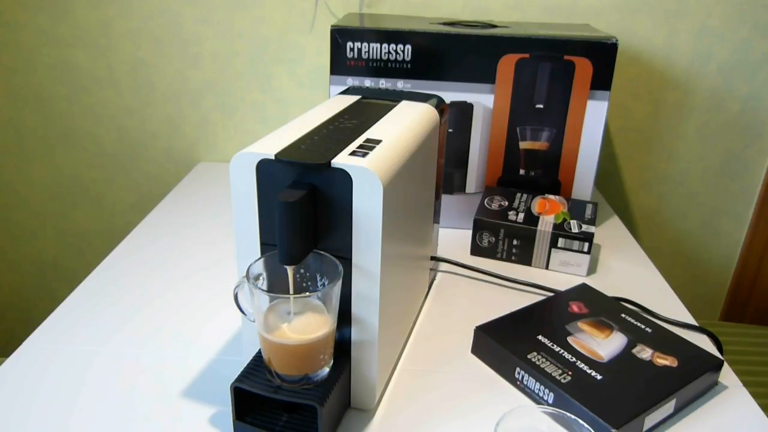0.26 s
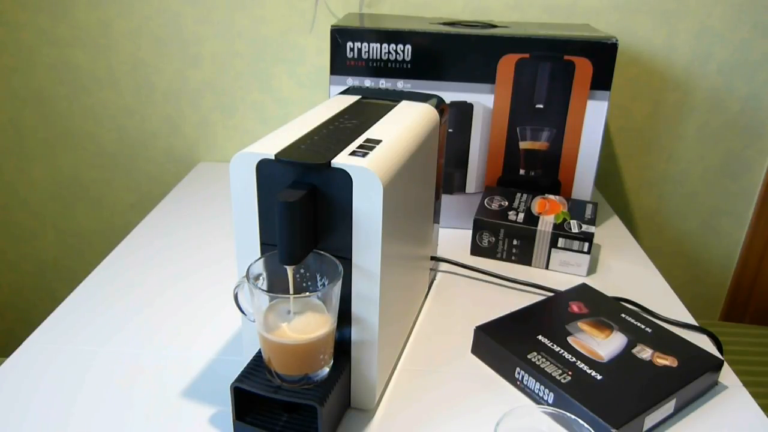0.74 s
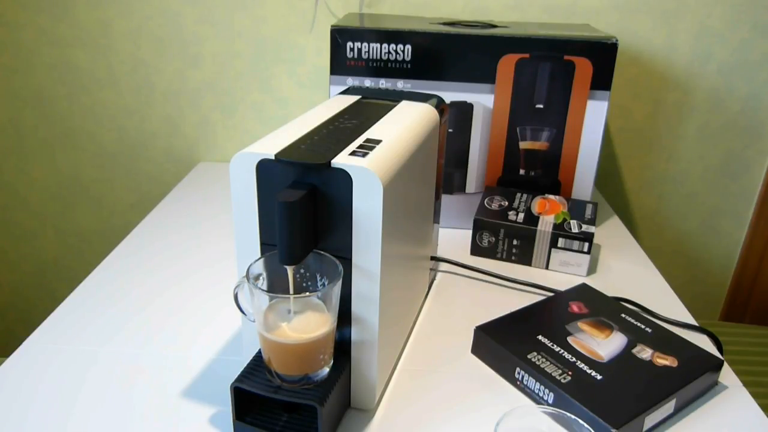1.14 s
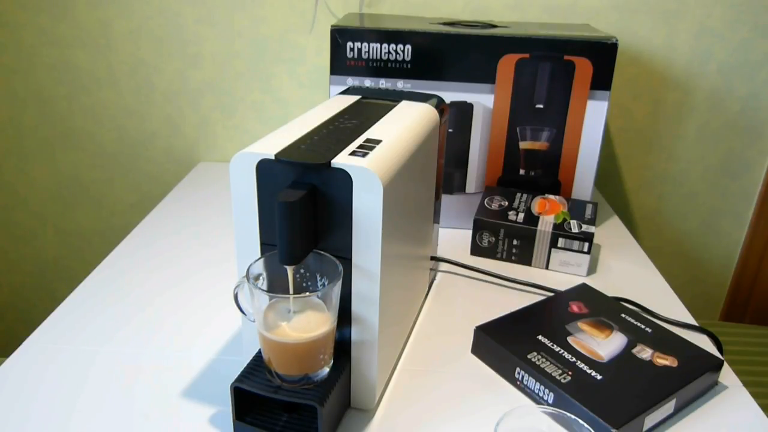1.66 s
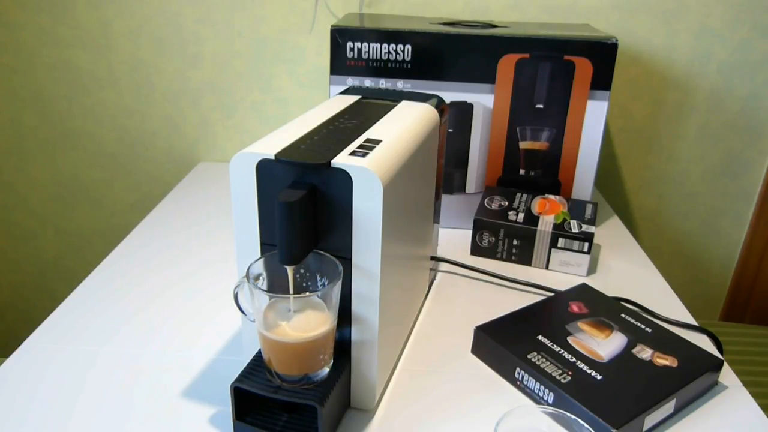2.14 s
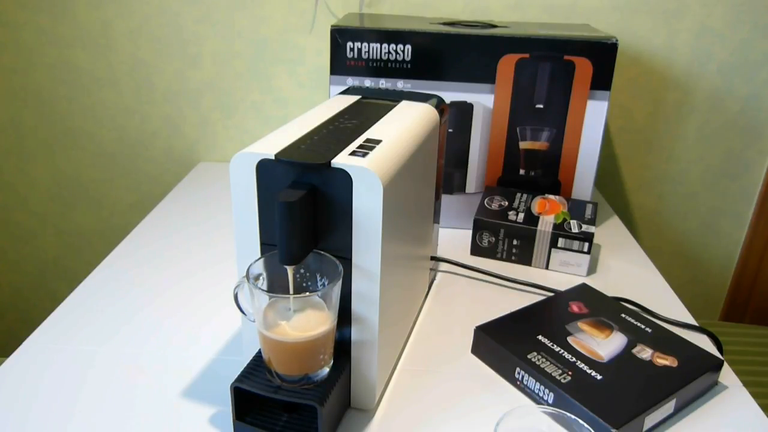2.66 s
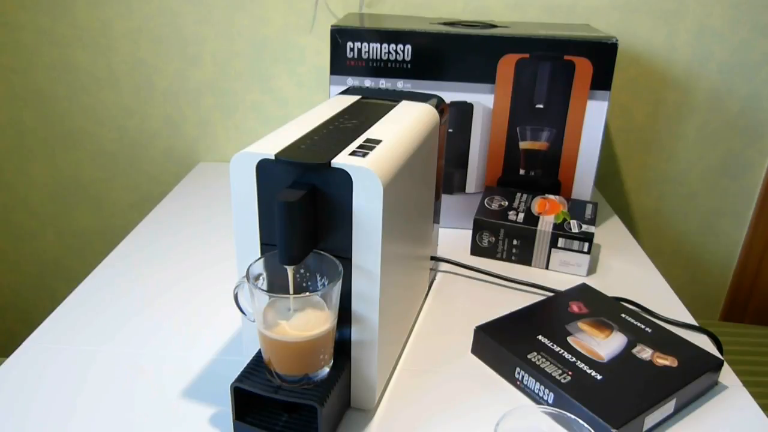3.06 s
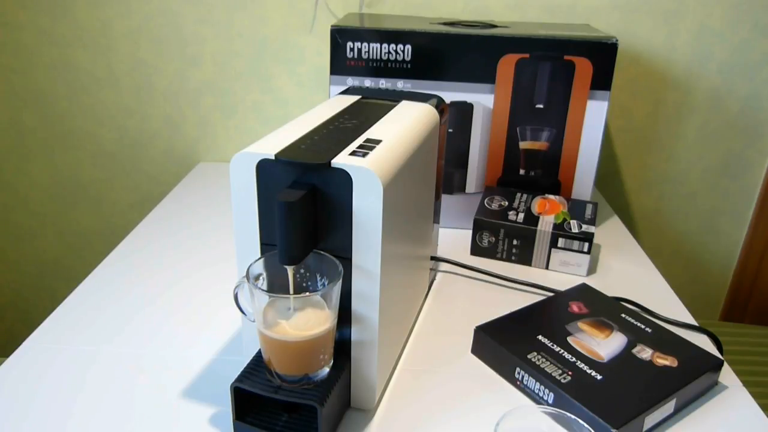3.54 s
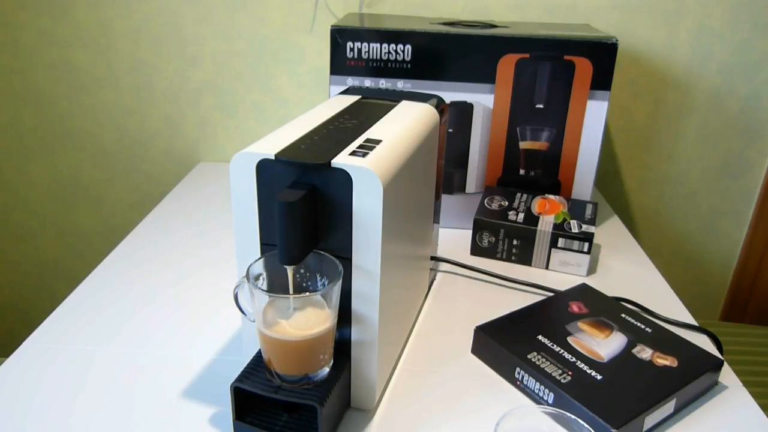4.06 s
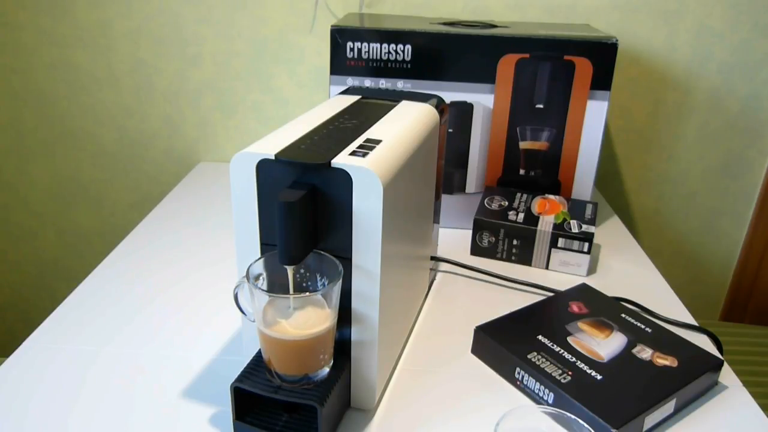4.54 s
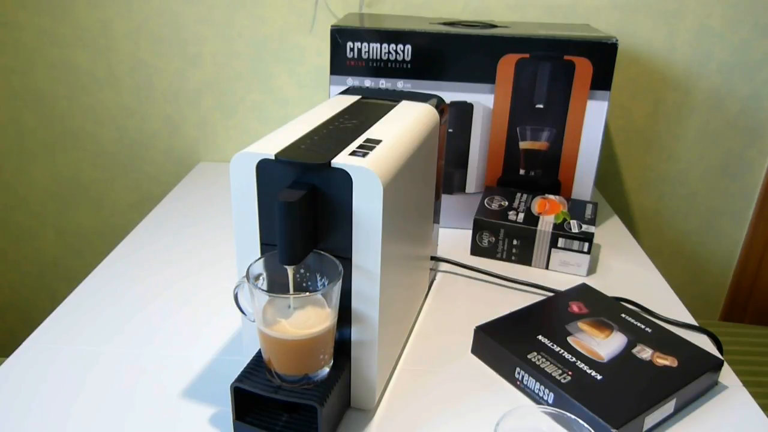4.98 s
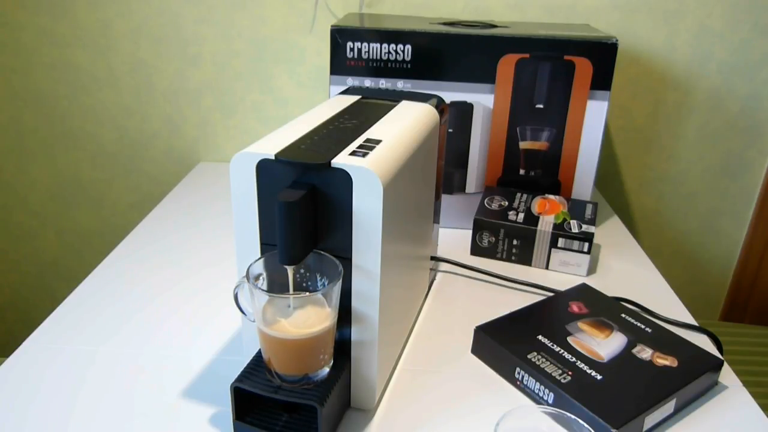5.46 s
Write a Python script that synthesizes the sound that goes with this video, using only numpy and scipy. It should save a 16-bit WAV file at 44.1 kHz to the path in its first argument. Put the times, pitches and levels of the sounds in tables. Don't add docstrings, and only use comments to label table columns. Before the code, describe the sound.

Close stereo pickup of a small piston pump working in a plastic coffee machine. Hard and soft strokes alternate so fast they fuse into a rough, constant drone; housing and valves chatter over it, with a bright hiss in step and a thin high pipe tone. Small timbre shifts occur as panels reseat. Right at the end the pump cuts out and everything dies within a fraction of a second in the small room.

```python
import sys
import numpy as np
from scipy import signal
from scipy.fft import rfft, irfft, next_fast_len
from scipy.io import wavfile

SR = 44100
rng = np.random.default_rng(int(sys.argv[2]) if len(sys.argv) > 2 else 0)


def digitize_waveform(pressure):
    field = np.atleast_2d(pressure).T
    bounded = np.clip(field, -1, 1)
    quanta = np.round(bounded * 32767).astype(np.int16)
    wavfile.write(sys.argv[1], SR, quanta)


def magnitude_from_level(level_db):
    exponent = np.asarray(level_db, float) / 20
    return 10 ** exponent


N = 251811
CYCLE_HZ, STOP_S = 25.006, 5.578
RATTLE_DB, RUMBLE_DB, FLOOR_DB, WHINE_DB = -40.5, -49.5, -52.5, -54.5
ROOM_T60_S, ROOM_DB = 0.32, 1.0
JUMP_S = 0.04
FEET_HZ = 70
PAN_SCATTER_DB = 1
SLOW = 64
T = np.arange(N) / SR
SIZE = next_fast_len(N + SR)
HZ = np.maximum(np.fft.rfftfreq(SIZE, 1 / SR), 1)

# [f/Hz, width/Hz, level/dB, evenness of the two strokes -1..1,
# blow t/ms in the cycle]
HUM_MODES = [(171.0, 12.0, -46.5, 0.6, 39.4), (174.0, 20.0, -43.0, 0.25, 13.04),
             (245.0, 29.0, -52.9, 0.07, 9.43), (337.0, 12.0, -41.6, 0.46, 7.93),
             (339.0, 12.0, -38.0, 0.54, 33.41), (382.0, 12.0, -40.7, 1.0, 36.4),
             (467.0, 124.0, -57.8, 0.35, 19.5), (649.0, 12.0, -48.4, 0.01, 11.04),
             (706.0, 55.0, -56.8, 0.36, 21.12), (723.0, 12.0, -44.3, 0.97, 7.24),
             (874.0, 23.0, -57.3, 0.51, 39.01), (978.0, 26.0, -49.5, -0.88, 15.88),
               (992.0, 34.0, -45.0, -0.26, 34.88), (1097.0, 12.0, -50.8, -0.51, 1.39),
               (1208.0, 12.0, -47.0, -0.04, 32.02), (1269.0, 55.0, -59.7, 0.2, 32.3),
               (1328.0, 14.0, -51.7, 0.62, 17.44), (1550.0, 12.0, -55.9, -0.84, 30.17),
             (552.8, 3.4, -60.5, 0.21, 18), (1440, 7.6, -64.5, -0.75, 9.3),
               (1607.6, 16.4, -56.5, -0.011, 12.1), (1750, 13, -66.5, 0.58, 30.4),
               (1925, 13, -63, -0.57, 21.54), (1975, 4.8, -68, -.9, 33.1), (2045, 16, -61.5, 0.42, 13.6)]
HUM_ORDERS = (3, 84)
# [f/Hz, left-right level/dB]
HUM_PAN = [(175, 0.5), (300, -4.5), (400, -1), (460, 19), (560, -4), (700, -0.5), (900, -1.5), (1100, 0)]
# [from t/s, to t/s, f/Hz, width/Hz, level/dB]
SEAT_SHIFTS = [(-1, .3, 925, 30, 7), (-1, .3, 1350, 200, -5), (-1, .3, 690, 40, -3),
               (-1, .3, 1800, 250, -3), (-1, 2.3, 450, 12, -4), (-1, 2.3, 250, 30, 2),
               (-1, 2.3, 750, 12, -3), (.3, 2.3, 800, 20, 4), (.3, 2.3, 725, 12, -7),
               (.3, 2.3, 1975, 12, 6), (.85, 2.3, 550, 12, 11), (2.3, 3.7, 1000, 30, -7),
               (2.3, 6, 900, 40, 3), (3.7, 6, 1925, 12, -6), (3.7, 6, 2040, 30, 5),
               (3.7, 5.2, 1000, 30, -2), (5.2, 6, 1000, 30, -6), (-1, .15, 3250, 50, -4),
               (.55, .9, 3250, 50, -4), (2.5, 3.45, 3250, 50, -3), (4.5, 6, 3250, 50, -5)]
PIPE_WHINE = (130, 1.3)
# [t/ms, clatter level/dB, valve level/dB, hiss level/dB]
CONTACTS = [(2, 3, -6, 0), (9.2, 9, 8, -1), (10.6, -3, 7, -9), (12.3, 0, 4, -4), (13.8, -3, 2, 2),
            (15.4, 4, 6, -6), (17.2, 7, -3, -6), (21.3, 3, -6, -9), (29.1, 9, 9, 0), (32.3, 7, 0, -6),
            (33.8, 0, 0, 1), (35.2, 2, 7, 0), (37, 3, -6, -2)]
# [f/Hz, level/dB per Hz]
RATTLE_COLOUR = [(820, -39), (1400, 1), (1500, -10.5), (1990, -6.5), (2340, -6.5), (2950, -9.5),
                 (3160, -5.5), (3430, -7), (4970, -5.5), (5610, -5), (10200, -6.5), (13500, -17.5),
                 (15500, -32)]
# [f/Hz, width/Hz, level/dB]
HOUSING_RINGS = [(1610, 38, -3), (1940, 200, -6.5), (2140, 180, -7), (2540, 65, -5.5), (2734, 120, -3.5),
                 (3795, 120, -3.5), (4060, 115, -4), (4720, 120, -7), (5016, 110, 1.5), (5360, 70, -11.5),
                 (6700, 120, -8), (10400, 410, -8), (11500, 540, -5)]
# [f/Hz, share alike each cycle]
REPEATED_SHARE = [(2000, 0.88), (4000, 0.74), (5200, 0.6), (7000, 0.34), (10000, 0.096)]
# [f/Hz, level/dB per Hz]
RUMBLE_COLOUR = [(25, -14), (60, -17), (110, -1), (170, -1), (350, -3), (700, -0.5), (1100, 6),
                 (1500, -2.5), (2000, -30)]
# [f/Hz, level/dB per Hz]
FLOOR_COLOUR = [(20, -7), (45, -6), (130, -27), (450, 9), (2200, -8), (5000, -17), (15000, -31)]
# [f/Hz, level/dB, t60/s]
RING_OUT_MODES = [(142, -7, 0.67), (178, 2.5, 0.33), (222, -2, 0.28), (342, -8, 0.24), (442, -3, 0.25),
                  (456, 2, .4), (634, -6, 0.38), (870, 2, 0.13), (1060, -24, .15), (1200, -7, .08),
                  (1450, -8, 0.18)]
# [f/Hz, side under mid level/dB]
SIDE_LEVEL = [(60, 0), (110, -15), (200, -14), (380, 10), (700, 4), (1290, -13), (2380, -13.5),
              (4400, -10.5), (8120, -9), (15000, -3.5)]
# [f/Hz, left-right level/dB]
LEFT_RIGHT = [(60, -4), (110, 12), (200, -13), (380, -7), (700, 4), (1290, -8.5), (2380, 1), (4400, 2),
              (8120, 0), (15000, 1.5)]


def rms_one(x):
    return x / np.sqrt(np.mean(x ** 2) + 1e-20)


def at_hz(points, hz):
    points = np.array(points)
    return np.interp(np.log(hz), np.log(np.maximum(points[:, 0], 1)), points[:, 1])


def causal(db):
    cep = irfft(np.asarray(db) * np.log(10) / 20)
    half = len(cep) // 2
    cep[1:half] *= 2
    cep[half + 1:] = 0
    return np.exp(rfft(cep))


def colour(x, db):
    return irfft(rfft(x, SIZE) * causal(db), SIZE)[..., :N]


def drift(rate_hz, count):
    r = np.exp(-2 * np.pi * SLOW * rate_hz / SR)
    settle = 3000
    chance = rng.standard_normal((count, N // SLOW + settle + 2))
    slow = signal.lfilter([1], [1, -2 * r, r * r], chance)[:, settle:]
    return slow / slow.std(axis=1, keepdims=True)


def dying(t60, late=0.0):
    return magnitude_from_level(-60 * np.maximum(T - STOP_S - late, 0) / t60)


def shifted(hz, t):
    total = 0
    for start, end, at, width, db in SEAT_SHIFTS:
        seated = (np.tanh((t - start) / JUMP_S) - np.tanh((t - end) / JUMP_S)) / 2
        total = total + db * np.exp(-((hz[:, None] - at) / width) ** 2) * seated
    return total


def to_stereo(mid, other):
    side = colour(other, at_hz(SIDE_LEVEL, HZ))
    tilt = at_hz(LEFT_RIGHT, HZ) / 2
    return np.array([colour(mid + side, tilt), colour(mid - side, -tilt)])


def hum_answer(order):
    hz = order * CYCLE_HZ
    answer = 0
    for mode_hz, width, db, even, ms in HUM_MODES:
        drive = magnitude_from_level(db) * (1 + even * (-1.0) ** order)
        resonance = 1 / (1j - 2 * (hz - mode_hz) / width)
        answer = answer + drive * resonance * np.exp(-2j * np.pi * hz * ms / 1000)
    return answer / np.sqrt(1 + (FEET_HZ / hz) ** 4)


def hum():
    order = np.arange(HUM_ORDERS[0], HUM_ORDERS[1] + 1)
    hz = order * CYCLE_HZ
    answer = hum_answer(order)
    level_db = 20 * np.log10(np.abs(answer))

    gap = np.clip(order * 0.013, 0.08, 0.24) * rng.choice([-1, 1], len(order))
    weak = np.clip((-45 - level_db) / 8, 0, 1)
    pan_db = at_hz(HUM_PAN, hz) + PAN_SCATTER_DB * rng.standard_normal(len(order)) * weak
    side = np.tanh(pan_db * np.log(10) / 40) + 1j * gap

    sway = drift(0.78, count=2 * len(order)).reshape(2, len(order), -1)
    loose = np.clip(magnitude_from_level(-66.0 - level_db) * np.clip(order / 25, 0, 1), 0, 0.16)[:, None]
    swell = magnitude_from_level(shifted(hz, np.arange(sway.shape[2]) * SLOW / SR))
    swell = swell / np.sqrt(np.mean(swell ** 2, axis=1, keepdims=True))
    size = np.sqrt(2) * answer[:, None] * swell * (1 + loose * (sway[0] + 1j * sway[1]))

    coarse = 4
    t = T[::coarse]
    out = np.zeros((2, 2, len(t)))
    for i, k in enumerate(order):
        line = np.repeat(size[i], SLOW // coarse)[:len(t)] * np.exp(2j * np.pi * k * CYCLE_HZ * t)
        out[int(k > 20)] += [(line * (1 + side[i])).real, (line * (1 - side[i])).real]
    low, high = signal.resample_poly(out, coarse, 1, axis=2)[..., :N]
    return low * dying(t60=0.22, late=0.017) + high * dying(t60=0.16)


def whine():
    order, wobble_rad = PIPE_WHINE
    turn = 2 * np.pi * CYCLE_HZ * T
    wander = np.interp(T, np.arange(100) / 17, rng.normal(0, 0.23, 100))
    tone = np.sin(order * turn + wobble_rad * np.sin(turn) + wander)
    level_db = WHINE_DB + shifted(np.array([order * CYCLE_HZ]), T)[0]
    return np.sqrt(2) * magnitude_from_level(level_db) * tone * dying(t60=0.12)


def strokes(column, fall_ms, spread_db, tick, steady_part):
    cycles = np.arange(-1, N / SR * CYCLE_HZ + 1)[:, None]
    table = np.array(CONTACTS)
    at = np.round((cycles / CYCLE_HZ + table[:, 0] / 1000) * SR).astype(int)
    second = (table[:, 0] > 25).astype(int)
    stroke = rng.standard_normal((len(cycles), 2))[:, second]
    size = magnitude_from_level(table[:, column] + spread_db * (stroke + 1.6 * rng.standard_normal(at.shape)))
    kicks = np.zeros(N)
    inside = (at >= 0) & (at < N)
    kicks[at[inside]] = size[inside]
    gate = steady_part + signal.lfilter([1], [1, -np.exp(-1000 / (fall_ms * SR))], kicks)
    return gate / np.sqrt(np.mean(gate ** 2)), tick * rms_one(kicks)


def repeating_noise(memory):
    count, length = int(N / SR * CYCLE_HZ) + 2, round(SR / CYCLE_HZ)
    settle = 60
    fresh = rng.standard_normal((count + settle, length))
    rows = signal.lfilter([1], [1, -memory], fresh, axis=0)[settle:]
    return rms_one(signal.resample(rows.ravel(), round(count * SR / CYCLE_HZ))[:N])


def room(x, close):
    t = np.arange(SR // 2) / SR
    tails = rng.standard_normal((2, len(t))) * magnitude_from_level(-60 * t / ROOM_T60_S) * (t > 0.004)
    near, other = rfft(tails / np.sqrt(np.sum(tails ** 2, axis=1, keepdims=True)), SIZE)
    near = 1 + magnitude_from_level(ROOM_DB) * near
    near *= causal(-12 * np.log10(np.abs(near) + 0.05))
    mid = irfft(rfft(x + 0.27 * close, SIZE) * near, SIZE)[:N] + close
    other = irfft(rfft(x + close, SIZE) * other, SIZE)[:N]
    return mid, other * np.std(mid) / np.std(other)


def rattle():
    share = np.clip(at_hz(REPEATED_SHARE, HZ), 0.001, 0.999)
    chatter = colour(repeating_noise(memory=0.97), 10 * np.log10(share))
    chatter += colour(rng.standard_normal(N), 10 * np.log10(1 - share))

    below = 1 / (1 + (HZ / 4500) ** 12)
    above = 1 / (1 + (5600 / HZ) ** 12)
    clatter = strokes(column=1, fall_ms=0.8, spread_db=1.0, tick=0.22, steady_part=1)
    valve = strokes(column=2, fall_ms=2.2, spread_db=1.2, tick=0.75, steady_part=0.3)
    hiss = strokes(column=3, fall_ms=1.6, spread_db=2.0, tick=0.03, steady_part=0.9)
    running = dying(t60=0.25, late=-0.018)
    driven = 0
    for band, (gate, ticks) in [(below, clatter), (1 - below - above, valve), (above, hiss)]:
        driven = driven + rfft([chatter * gate * running, ticks * running], SIZE) * band

    peaks = sum(magnitude_from_level(db + 8.5) ** 2 / (1 + (2 * (HZ - hz) / width) ** 2) for hz, width, db in HOUSING_RINGS)
    low_cut = 10 * np.log10(1 + (1560 / HZ) ** 24)
    shape = at_hz(RATTLE_COLOUR, HZ) + 10 * np.log10(1 + peaks) - low_cut
    bursts, ticks = irfft(driven * causal(shape), SIZE)[:, :N]
    mid, other = room(bursts, ticks)
    return magnitude_from_level(RATTLE_DB) * rms_one(to_stereo(mid, other))


def steady(spectrum, level_db):
    mid, other = colour(rng.standard_normal((2, N)), at_hz(spectrum, HZ))
    return magnitude_from_level(level_db) * rms_one(to_stereo(mid, other))


def rumble():
    released = 1 + 1.1 * np.clip((T - STOP_S) / 0.049, 0, 1)
    return steady(RUMBLE_COLOUR, RUMBLE_DB) * released * dying(t60=0.33, late=0.015)


def floor():
    return steady(FLOOR_COLOUR, FLOOR_DB)


def ring_out():
    after = np.maximum(T - STOP_S - 0.012, 0)
    out = 0
    for hz, db, t60 in RING_OUT_MODES:
        out = out + magnitude_from_level(db - 40.5 - 60 * after / t60) * np.sin(2 * np.pi * hz * after)
    return out * (1 - np.exp(-after / 0.019))


def scene():
    return hum() + whine() + rattle() + rumble() + floor() + ring_out()


def roll_off(x):
    return signal.sosfilt(signal.butter(12, 15660, fs=SR, output="sos"), x)


def record(dry):
    return roll_off(dry)


dry = scene()
out = record(dry)
digitize_waveform(out)
```